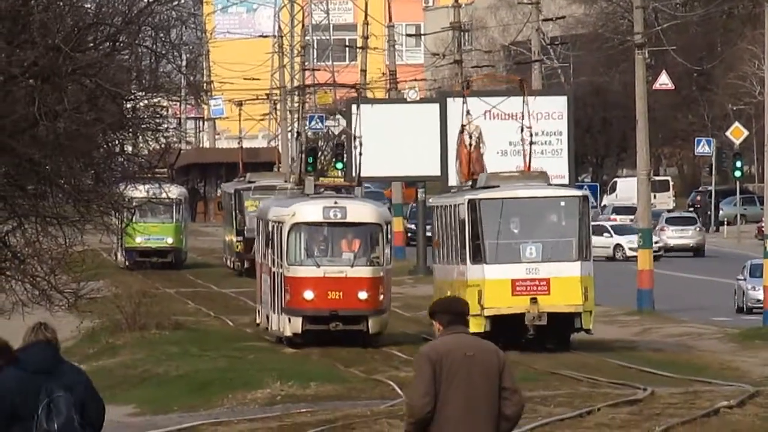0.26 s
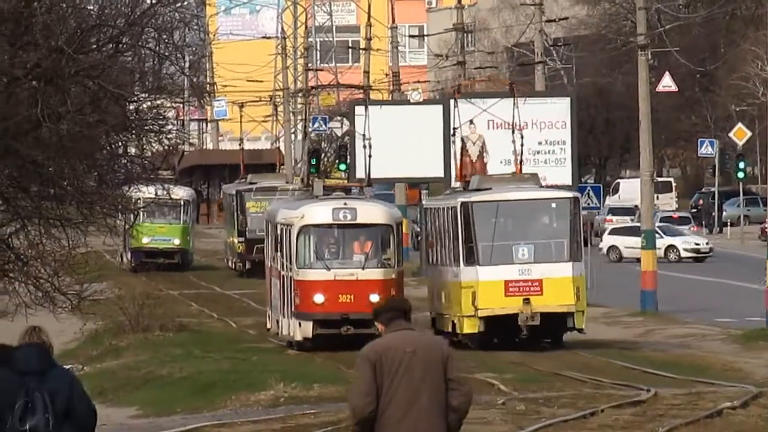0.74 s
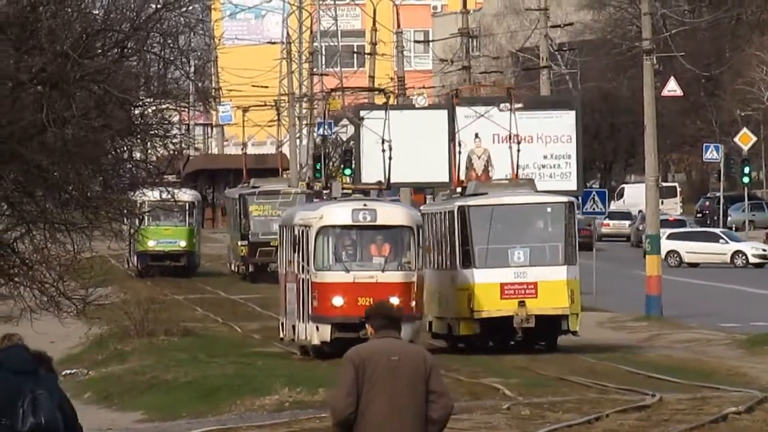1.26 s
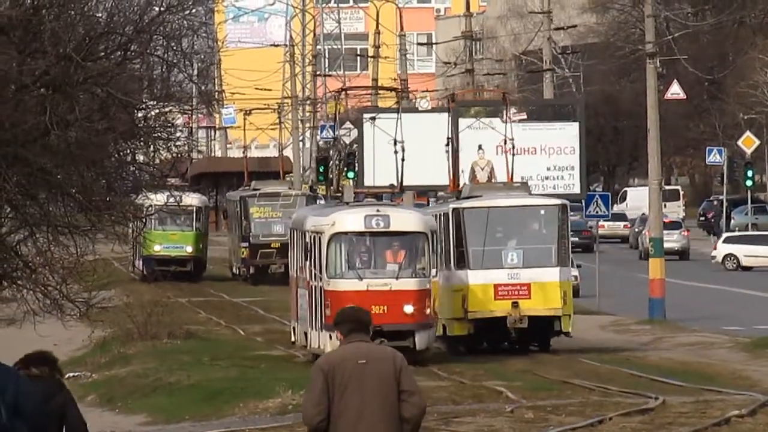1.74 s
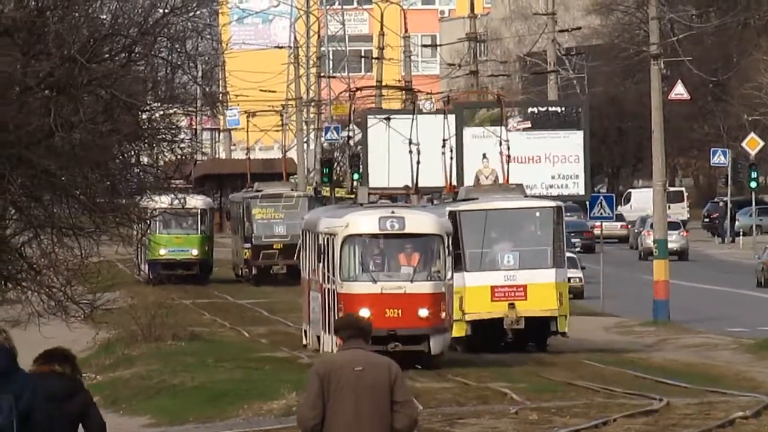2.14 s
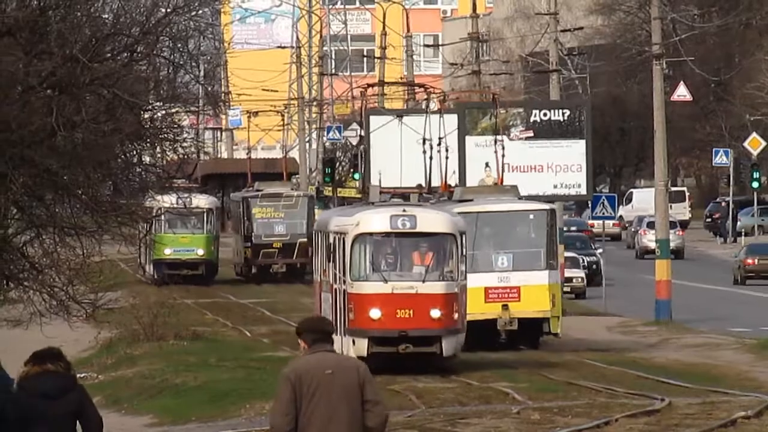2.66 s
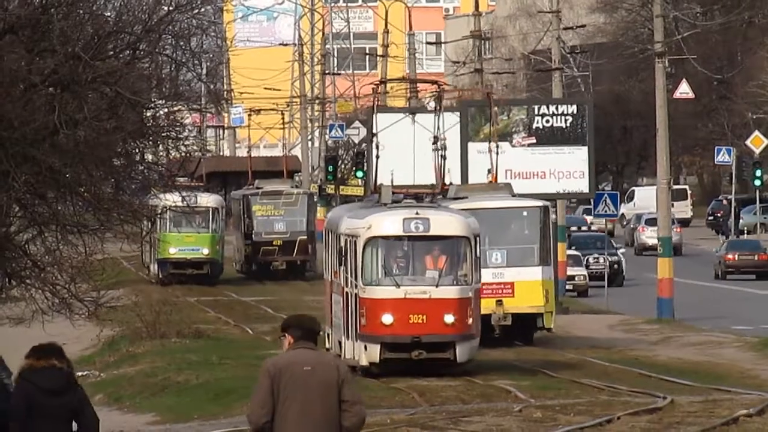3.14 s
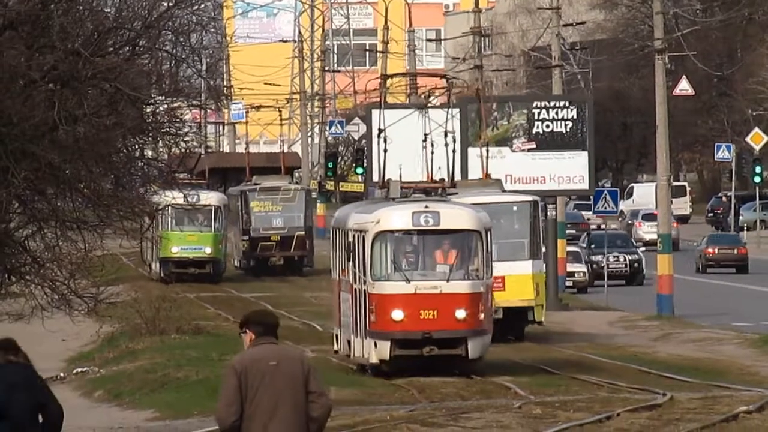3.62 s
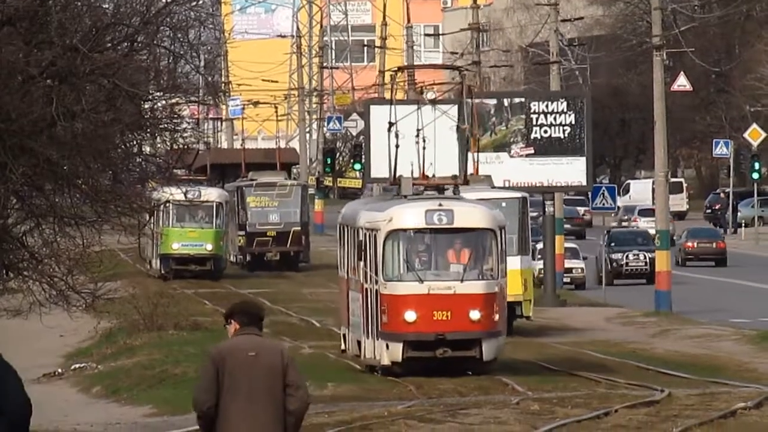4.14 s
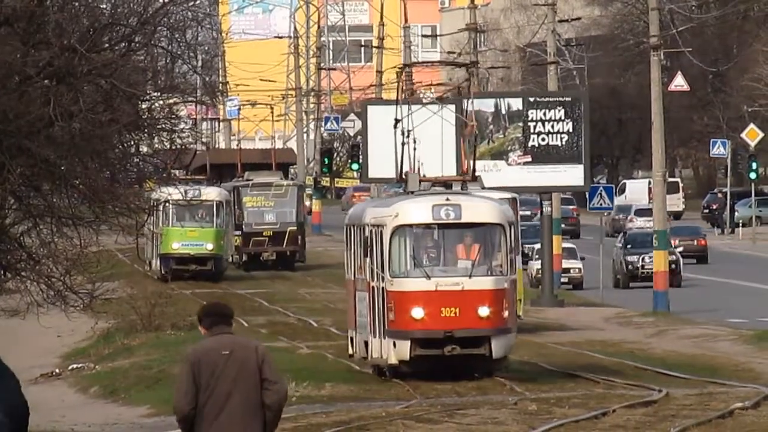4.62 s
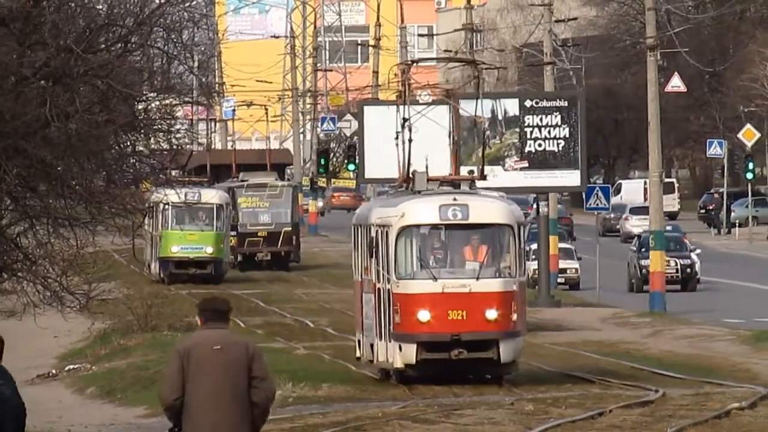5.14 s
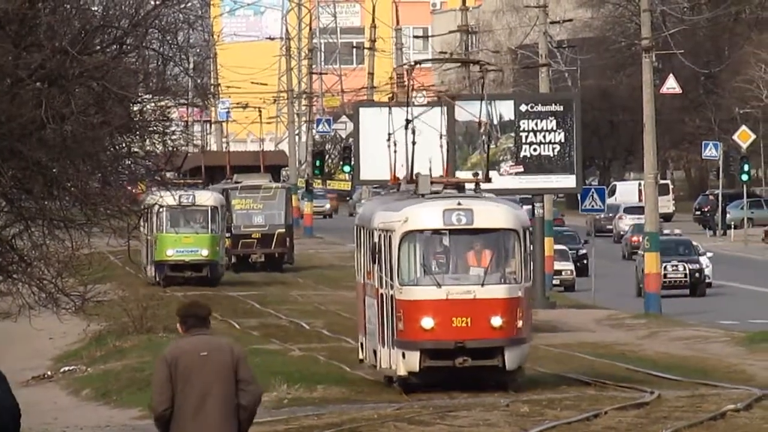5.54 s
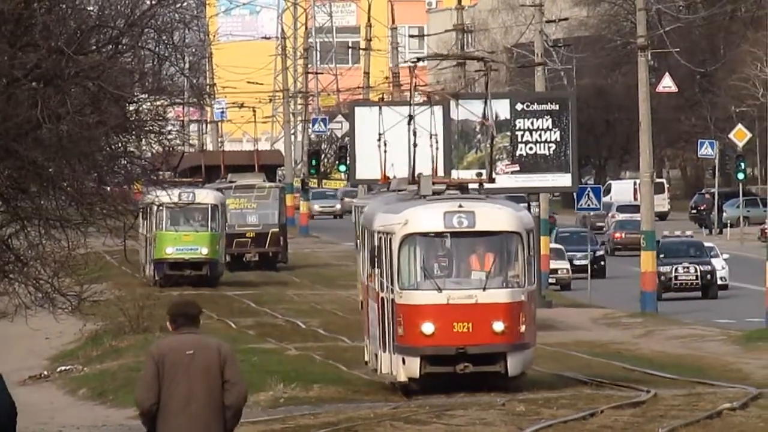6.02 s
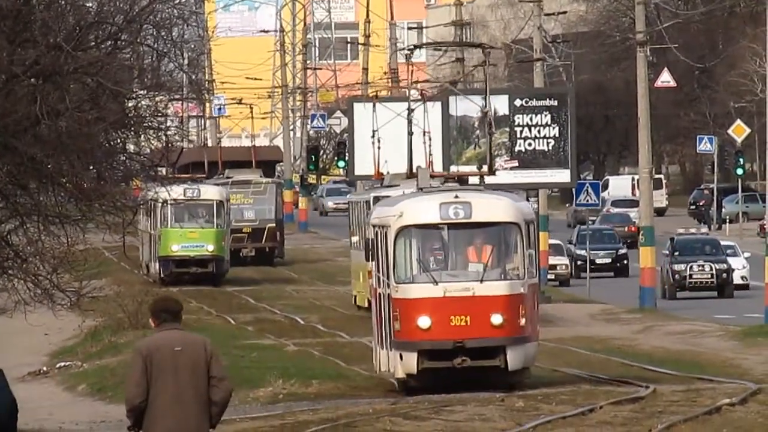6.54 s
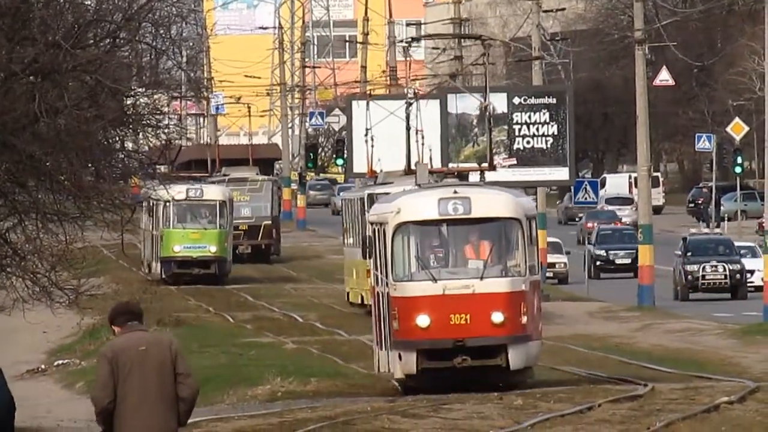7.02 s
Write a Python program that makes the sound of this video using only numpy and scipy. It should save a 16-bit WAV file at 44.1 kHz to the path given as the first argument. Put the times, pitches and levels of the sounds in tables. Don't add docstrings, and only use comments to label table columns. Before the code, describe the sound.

Trams roll slowly past a busy road with low rumble, motor hum and tyre roar, wind thumping the microphone, ending on a thin high brake squeal.

```python
import sys
import numpy as np
from scipy import signal
from scipy.fft import rfft, irfft
from scipy.io import wavfile
from scipy.ndimage import uniform_filter1d

SR = 44100
rng = np.random.default_rng(int(sys.argv[2]) if len(sys.argv) > 2 else 0)


def dump_mix(stems):
    frames = np.atleast_2d(stems).T
    limited = np.clip(frames, -1, 1)
    pcm = np.round(limited * 32767).astype(np.int16)
    wavfile.write(sys.argv[1], SR, pcm)


def volts_from_decibels(level):
    exponent = np.asarray(level, float) / 20
    return 10 ** exponent


N = 321048
M = 2 ** 12 * 81
T = np.arange(N) / SR
SLOW_T = T[::64]
HZ = np.maximum(np.fft.rfftfreq(M, 1 / SR), 1)

# frequency in Hz, density in dB per Hz.
RUMBLE_SPECTRUM = [(28, -33), (38, -15), (50, -4), (70, -1.5), (110, 0), (150, -3.5), (220, -5.5),
                   (320, -8), (450, -19.5)]
# frequency in Hz, density in dB per Hz.
ROAR_SPECTRUM = [(250, -28), (420, -2), (650, -1.5), (960, 0.5), (1400, -7), (2000, -15), (2600, -23.5),
                 (3800, -30.5), (4700, -39), (6800, -37), (9500, -40.5), (12000, -44), (15600, -62)]
# time in seconds, level in dB.
RAIL_LEVELS = [(0, 2.5), (.6, -2.5), (.97, 3), (1.25, 1.5), (1.85, 1.5), (2.5, 1), (3.2, 2), (4.1, -1),
               (4.6, -0.5), (4.89, 1.5), (5.2, -3.5), (5.6, -3.5), (5.75, -8), (6.45, 2.5), (6.8, -7.5),
               (7.28, 0.5)]
# time in seconds, lift over the steady roar in dB, time to half power in seconds,
# centre of the tyre colour in Hz, spread in octaves.
CAR_PASSES = [(.6, 1.5, 0.18, 1540, 1.26), (.75, -2, 0.11, 710, 0.39), (1.95, 3.5, 0.22, 760, 0.43),
              (2.0, 5, 0.27, 3500, 0.33), (2.55, 6.5, 0.23, 2560, 0.44), (2.3, 1, 0.23, 6000, .6),
              (3.7, 2.5, 0.87, 980, 0.65), (4.15, 5, 0.33, 1330, 0.22), (4.4, 3.5, 0.34, 1880, 0.43),
              (4.9, 6.5, 0.34, 1750, 0.42), (5.0, 1.5, 0.26, 1090, 0.13), (5.45, 3, 0.23, 1100, 0.25),
              (7.2, 1, 0.16, 1990, 1.8), (0.1, -1, 0.55, 3500, 0.28), (3.6, -0.5, 0.49, 4200, 0.29),
              (4.4, -1, .4, 3800, .5)]
# frequency in Hz, likeness from 0 to 1.
PORT_LIKENESS = [(60, 0.98), (290, 1), (640, 0.67), (1400, 0.57), (3100, 0.84), (6000, 0.93), (9000, 0.31),
                 (14000, 0.65)]
# frequency in Hz, left minus right in dB.
PORT_LEAN = [(120, 0), (200, 0.3), (380, 1.5), (700, 0.4), (1290, -4.5), (2380, -4.5), (4400, -2.5),
             (8120, 1), (15000, .8)]
# frequency in Hz, lead of the left in radians.
PORT_LEAD = [(150, 0), (300, -1.27), (600, 0), (1100, -1), (2200, 0.84), (6000, -0.5), (7500, -1.1),
             (9000, -1), (11000, -2), (15000, -2.5)]
# time in seconds, level in dB.
MOTOR_LOAD = [(0, -54), (.24, -26), (.49, -40), (.7, -22.5), (.8, -36), (.93, -23.5), (1.1, -29),
              (1.48, -20.5), (1.95, -25.5), (2.5, -31.5), (2.68, -30), (2.82, -34), (3.4, -20), (3.85, -21),
              (4.08, -31.5), (4.4, -25.5), (5.5, -31), (6.8, -38.5)]
MOTOR_PARTIALS_DB = [-16, -1, -12.5]
# time in seconds, peak in dB, width in seconds.
ECHO_SWELLS = [
    [(0, -30.5, 0.071), (.62, -34, 0.13), (.82, -31, 0.055), (1.14, -24, 0.045), (1.42, -25.5, 0.064),
     (2.0, -31, 0.28), (2.65, -32, .15), (2.96, -34, 0.05), (3.31, -31, 0.033), (3.53, -21.5, 0.042),
     (4.21, -26, .06), (4.46, -30, 0.053), (4.86, -30, 0.12), (5.45, -32, 0.078)],
    [(7.15, -36.5, 0.072)],
    [(.2, -26.5, 0.092), (.62, -31.5, 0.15), (.82, -29.5, 0.049), (1.88, -31, 0.045), (2.68, -35.5, .05),
     (3.0, -31.5, 0.12), (3.28, -26, 0.11), (3.6, -27, 0.04), (3.8, -30.5, .1), (4.18, -27, 0.15),
     (4.85, -26.5, 0.068), (6.1, -34, 0.23), (6.7, -34.5, 0.28), (7.17, -30, 0.13)],
]
# time in seconds, peak in dB, width in seconds.
GEAR_SWELLS = [
    (1.3, -42, 0.052),
    (1.8, -39.5, 0.085),
    (2.72, -33, .07),
    (3.2, -44, .08),
    (3.64, -36.5, 0.08),
]
# harmonic number, relative level in dB.
UPPER_PARTIALS = [(4, -16), (6, -17), (7, -21)]
# time in seconds, level in dB.
GUST_LEVELS = [(0, -30), (.45, -27.5), (.77, -22.5), (.9, -32.5), (1.32, -38.5), (1.95, -29), (2.09, -50),
               (2.28, -30), (2.55, -55), (2.85, -36), (3.7, -39), (4.02, -53), (4.2, -31.5), (5.0, -34),
               (5.9, -27.5), (6.36, -23.5), (6.95, -32.5), (7.2, -20.5)]
# time in seconds, peak in dB, pitch in Hz.
HARD_PUFFS = [(6.415, -4.5, 300), (0.141, -5, 340), (0.336, -7, 266), (0.601, -7, 270), (0.632, -4, 270),
              (0.729, -7.5, 340), (0.756, -11, 280), (0.778, -5, 240), (0.82, -4, 318), (0.992, -12, 212),
              (1.928, -12, 250), (4.305, -10, 250), (4.806, -9, 318), (5.451, -12, 310), (5.545, -12, 350),
              (5.738, -12.5, 260), (6.03, -2.5, 302), (6.048, -4, 400), (6.062, -0.5, 357),
              (6.124, -1.5, 380), (6.144, -4.5, 370), (6.329, -3.5, 360), (6.346, -2.5, 330),
              (6.466, -9, 340), (6.606, -10, 310), (6.672, -10, 415), (7.021, -8, 300), (7.182, -6, 308),
              (7.202, -7, 324), (7.217, -7, 340)]
# time in seconds, peak in dB, centre in Hz, bandwidth in Hz, length in seconds.
IMPACTS = [(.003, -36.5, 2000, 300, 0.007), (0.223, -36, 2020, 250, 0.0087), (.44, -37, 1700, 198, .008),
           (0.262, -47.5, 2080, 300, .005), (.55, -51, 3470, 1000, 0.11), (2.745, -61, 5300, 300, .015),
           (2.81, -56, 9000, 3000, .012), (4.559, -52, 6300, 3000, .004), (5.17, -63, 9000, 2500, 0.017),
           (5.87, -63, 5260, 200, 0.011), (5.92, -68, 15400, 250, .06)]
# (each: peak time in seconds, peak in dB, rise and fall in seconds).
SQUEAL_MODES = [
    (13600, 280, 0.09, 1.4, [(2.702, -47, 0.0061, 0.057), (2.738, -48.5, 0.045, 0.022), (4.704, -65.5, 0.038, 0.018), (4.774, -45, 0.034, 0.048)]),
    (15050, 200, .1, 2.4, [(3.064, -60, 0.031, .04), (3.466, -71, .02, .1), (3.54, -57, .03, 0.057), (5.2, -80, .2, .15)]),
    (6610, 60, .4, 0.35, [(3.188, -64, .06, .06), (3.442, -61, .04, 0.1), (3.68, -58.5, 0.37, .08), (6.186, -59.5, .025, .02), (6.296, -65, .03, 0.023), (6.34, -65, 0.018, .15), (6.73, -62.5, .04, .25), (6.875, -67, .04, .18)]),
    (6780, 50, .6, 0.35, [(7.234, -57.5, 0.045, .04)]),
    (11340, 57, .7, 0.34, [(6.43, -71, .15, .04), (7.02, -61, 0.69, 0.17), (7.1, -61.5, .07, .2), (7.195, -57, 0.035, .2)]),
    (4900, 40, 0.65, 0.22, [(6.9, -66, 0.058, .2), (6.97, -63, .2, 0.096), (7.25, -67, 0.12, 0.23)]),
]
# harmonic number, level in dB, difference over sum as a ratio.
BRAKE_HARMONICS = [(1, 0, .15), (2, -17, .75), (3, -27, 4.), (4, -40, 4.)]


def every_sample(slow):
    return np.interp(T, SLOW_T, slow)


def level_over_time(table):
    seconds, db = np.transpose(table)
    return np.interp(T, seconds, db)


def over_hz(table, hz):
    table_hz, value = np.transpose(table)
    return np.interp(np.log(hz), np.log(table_hz), value)


def unit(x):
    return x / np.sqrt(np.mean(np.abs(x) ** 2))


def slow_walk(rate):
    hold = int(SR / 64 / rate)
    steps = np.repeat(rng.standard_normal(N // 64 // hold + 2), hold)
    slewed = uniform_filter1d(uniform_filter1d(steps, hold), hold)
    return unit(slewed[:len(SLOW_T)])


def walk(rate):
    return every_sample(slow_walk(rate))


def hump(s, width):
    return np.exp(-.5 * ((SLOW_T - s) / width) ** 2)


def bell(centre_hz, octaves):
    return np.exp(-.5 * (np.log2(HZ / centre_hz) / octaves) ** 2)


def shape(x, gain):
    pad = (M - N) // 2
    x = np.pad(x, [(0, 0)] * (x.ndim - 1) + [(pad, M - N - pad)], mode="reflect")
    return irfft(rfft(x) * gain, M)[..., pad:pad + N]


def passing_cars(hz):
    power = 0
    for s, db, half_s, centre_hz, octaves in CAR_PASSES:
        colour = np.exp(-.5 * (np.log2(min(hz, 6000) / centre_hz) / octaves) ** 2)
        power = power + volts_from_decibels(db) ** 2 * colour / (1 + ((SLOW_T - s) / half_s) ** 2)
    return power * (0.9 if hz > 5000 else 1)


def street():
    rails = level_over_time(RAIL_LEVELS)[::64]
    t = SLOW_T - T.mean()
    rumble = volts_from_decibels(-46 + over_hz(RUMBLE_SPECTRUM + [(900, -61.5)], HZ))
    roar = volts_from_decibels(-61.5 + over_hz(ROAR_SPECTRUM, HZ))
    noise = np.sqrt(SR / 2) * rfft(rng.standard_normal((2, M))) * np.hypot(rumble, roar)
    out = np.zeros((2, N))
    for hz in 32 * 2 ** np.arange(0, 9.1, .5):
        place = np.interp(np.log(hz), np.log([80, 560, 1150]), [0, 1, 2])
        rail, body, road = np.clip(1 - abs(place - np.arange(3)), 0, 1)
        fade_db_per_s = -0.79 * body - 0.52 * road
        swell_db, flicker_db = 0.1 * slow_walk(1.404), 0.94 * slow_walk(9)
        level = volts_from_decibels(rail * rails + fade_db_per_s * t + swell_db + flicker_db)
        band = np.cos(np.pi * np.clip(np.log2(HZ / hz), -.5, .5)) ** 2
        gain = every_sample(level * np.sqrt(1 + passing_cars(hz)))
        out += gain * irfft(noise * band, M)[:, :N]
    return out


def hum():
    shaft_hz = 52.06 * (1 + 0.003976 * walk(3))
    phase = 2 * np.pi * np.cumsum(shaft_hz) / SR
    load_db = level_over_time(MOTOR_LOAD)
    out = np.zeros(N)
    for k, (db, swells) in enumerate(zip(MOTOR_PARTIALS_DB, ECHO_SWELLS)):
        echoes = every_sample(sum(volts_from_decibels(peak_db) * hump(s, width) for s, peak_db, width in swells))
        level = np.hypot(volts_from_decibels(load_db + db), echoes)
        out += level * np.sin((k + 1) * phase + 0.23 * walk(5) + k)
    gear = every_sample(sum(volts_from_decibels(db) * hump(s, width) for s, db, width in GEAR_SWELLS))
    out += gear * np.cos(7 * phase)
    slow_load_db = uniform_filter1d(load_db - load_db.mean(), SR)
    for k, db in UPPER_PARTIALS:
        level = volts_from_decibels(-29 + db + 0.5 * slow_load_db + 1.84 * walk(3.95))
        out += level * np.sin(k * phase + 0.7 * walk(6))
    return np.sqrt(2) * out


def add_puffs(mid, side, veer_db):
    lag = np.arange(-600, 601) / SR
    for s, db, hz in HARD_PUFFS:
        turn, hit = rng.uniform(-1.1, 1, 2)
        at = round(s * SR) + np.arange(-600, 601)
        cycles = lag * hz
        side_shell = np.exp(-.5 * (cycles / 0.88 * 2) ** 2)
        mid_shell = np.exp(-.5 * (cycles / 0.88 * 1.58) ** 2)
        mid_level = volts_from_decibels(db - 6.5 + np.interp(s, T, veer_db))
        side[at] += volts_from_decibels(db) * side_shell * np.sin(2 * np.pi * cycles + np.pi * turn)
        mid[at] += mid_level * mid_shell * np.cos(2 * np.pi * 0.67 * cycles + np.pi * turn + hit)


def wind():
    gust_db = level_over_time(GUST_LEVELS) + 3.5 * walk(22)
    veer_db = 0.5 * (T - T[-1])
    eddies_per_s, scatter_db = 260, 5
    sizes = volts_from_decibels(scatter_db * np.minimum(rng.exponential(size=N), 1.9)) * rng.choice([-1, 1], N)
    eddies = sizes * (rng.random(N) < eddies_per_s / SR)
    port = rng.choice([-1, 1], N)
    stiff = 1 / (1 + volts_from_decibels(2 * (-29 - gust_db)))
    calm_side = unit(shape(eddies * port, bell(130, 0.47)))
    stiff_side = unit(shape(eddies * port, bell(280, 0.47)))
    side = volts_from_decibels(gust_db) * (np.sqrt(1 - stiff) * calm_side + np.sqrt(stiff) * stiff_side)
    mid = volts_from_decibels(gust_db - 3.5 + veer_db) * unit(shape(eddies, bell(158, 0.76)))
    add_puffs(mid, side, veer_db)
    side = shape(side, 1 / (1 + (75 / HZ) ** 4))
    return np.array([mid + side, mid - side])


def knocks(size=2 ** 14):
    out = np.zeros(N + size)
    lag = (np.arange(size) - size // 2) / SR
    hz_axis = np.fft.rfftfreq(size, 1 / SR)
    for s, db, hz, width_hz, length in IMPACTS:
        shell = np.exp(-.5 * (lag / length * 2) ** 2)
        band = np.exp(-2 * ((hz_axis - hz) / width_hz) ** 2)
        knock = shell * irfft(rfft(rng.standard_normal(size)) * band)
        out[round(s * SR):][:size] += volts_from_decibels(db) * unit(knock) * np.sqrt(np.mean(shell ** 2))
    return out[size // 2:][:N]


def ports(shared, own):
    like = np.clip(over_hz(PORT_LIKENESS, HZ), 0, 1)
    turn = volts_from_decibels(over_hz(PORT_LEAN, HZ) / 2) * np.exp(.5j * over_hz(PORT_LEAD, HZ))
    shared = shape(shared, np.sqrt((1 + like) / 2))
    own = shape(own, np.sqrt((1 - like) / 2))
    return shape(np.array([shared + own, shared - own]), np.array([turn, 1 / turn]))


def burst(s, db, rise, fall):
    return volts_from_decibels(db - 20 * np.where(SLOW_T < s, (s - SLOW_T) / rise, (SLOW_T - s) / fall))


def narrow(hz, width_hz):
    spectrum = np.zeros(M, complex)
    near = np.flatnonzero(abs(HZ - hz) < 1.3 * width_hz)
    draws = rng.standard_normal((len(near), 2)) @ [1, 1j]
    spectrum[near] = draws * np.exp(-2 * ((HZ[near] - hz) / width_hz) ** 2)
    return np.sqrt(2) * unit(np.fft.ifft(spectrum)[:N])


def spread(wave, skew):
    return wave.imag + skew * wave.real * np.array([[1], [-1]])


def flange_squeals():
    out = np.zeros((2, N))
    for hz, width_hz, steady, skew, bursts in SQUEAL_MODES:
        chatter = narrow(hz, width_hz)
        gains = np.array([burst(*row) for row in bursts])
        total = gains.sum(axis=0)
        since = sum(g * np.clip(SLOW_T - row[0], -.1, .1) for g, row in zip(gains, bursts))
        pitch_hz = hz - 500 * every_sample(since / (total + 1e-9)) + 0.4 * width_hz * walk(12)
        ring = np.sqrt(2) * np.exp(2j * np.pi * np.cumsum(pitch_hz) / SR)
        squeal = np.sqrt(steady) * ring + np.sqrt(1 - steady) * chatter
        out += spread(squeal, skew) * every_sample(total * volts_from_decibels(2 * slow_walk(25)))
    return out


def brake():
    start_s, bite_s, level_db, sag_db_per_s = 7.03, 0.021, -40, -10
    phase = 2 * np.pi * np.cumsum(3907 + 1.1 * walk(29.9)) / SR
    since = np.clip(T - start_s, 0, None)
    grip = volts_from_decibels(level_db + sag_db_per_s * since) * (1 - np.exp(-since / bite_s)) ** 4
    tones = sum(volts_from_decibels(db) * spread(np.exp(1j * k * phase), skew) for k, db, skew in BRAKE_HARMONICS)
    return np.sqrt(2) * grip * tones * volts_from_decibels([[1.2], [-1.3]])


def scene():
    shared, own = street()
    return ports(shared + hum() + knocks(), own) + wind() + flange_squeals() + brake()


def band_limit(x):
    return signal.sosfilt(signal.butter(12, 15760, fs=SR, output="sos"), x)


def record(dry):
    ceiling, whine_hz = 1.15, 15734
    rounded = ceiling * np.tanh(dry / ceiling)
    cut = shape(rounded, np.clip((whine_hz - HZ) / 100, 0, 1))
    whine = volts_from_decibels(-80) * np.sqrt(2) * np.sin(2 * np.pi * whine_hz * T)
    duck_s, duck_db, release_s = 6.066, -4.5, 1
    since = np.clip(T - duck_s, 0, None)
    gain_db = duck_db * np.exp(-since / release_s) * (T > duck_s)
    gain = volts_from_decibels(uniform_filter1d(gain_db, size=800))
    stop = np.sin(np.pi / 2 * np.clip((T[-1] - T) / 0.003, 0, 1))
    return band_limit((cut + whine) * gain * stop)


dry = scene()
out = record(dry)
dump_mix(out)
```